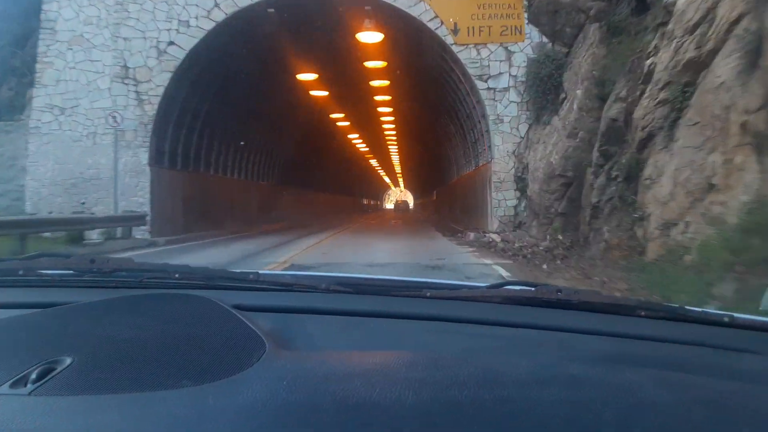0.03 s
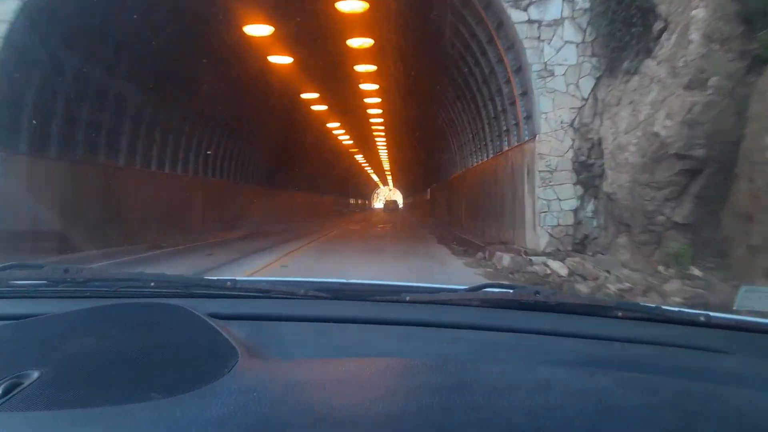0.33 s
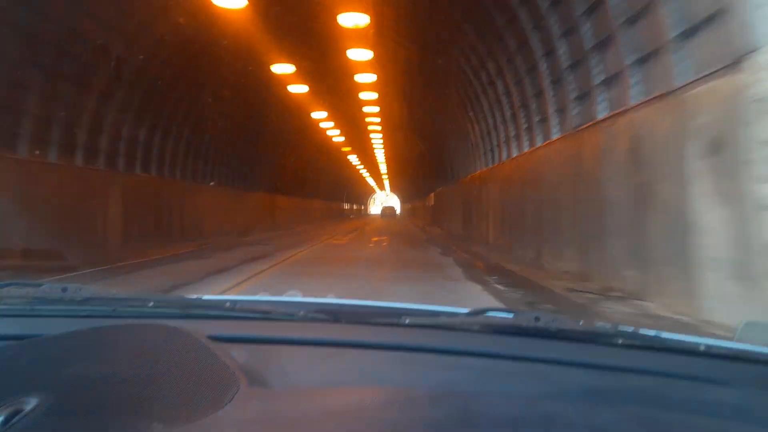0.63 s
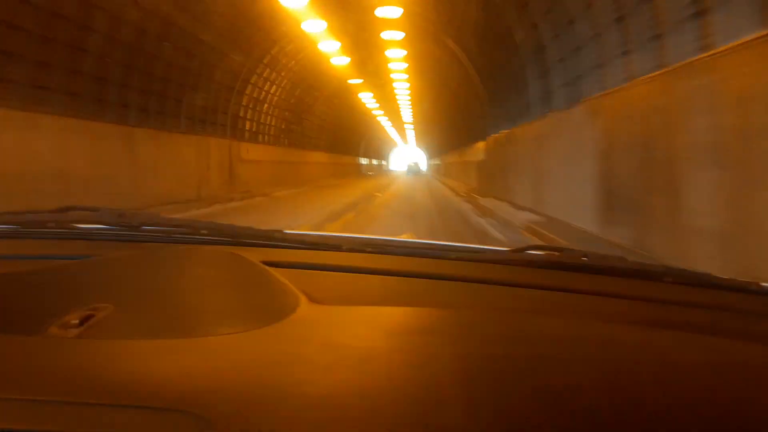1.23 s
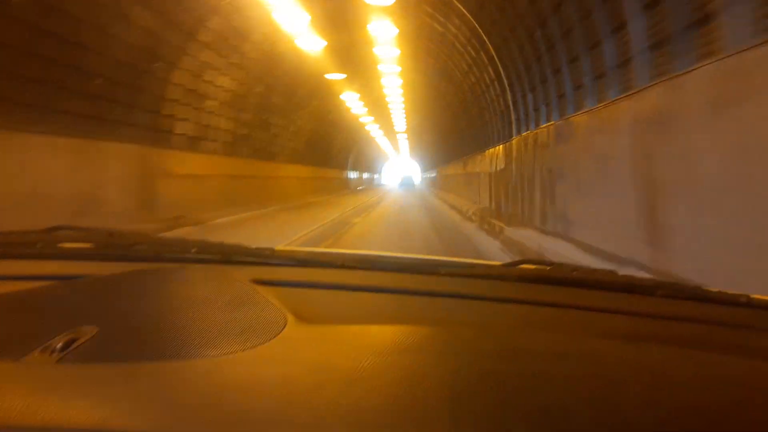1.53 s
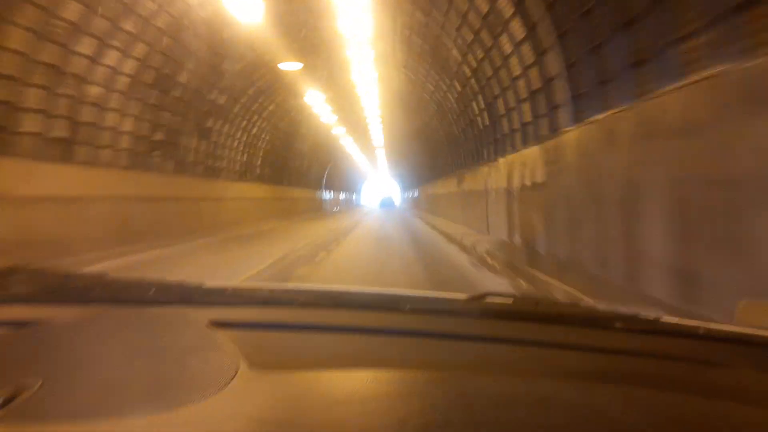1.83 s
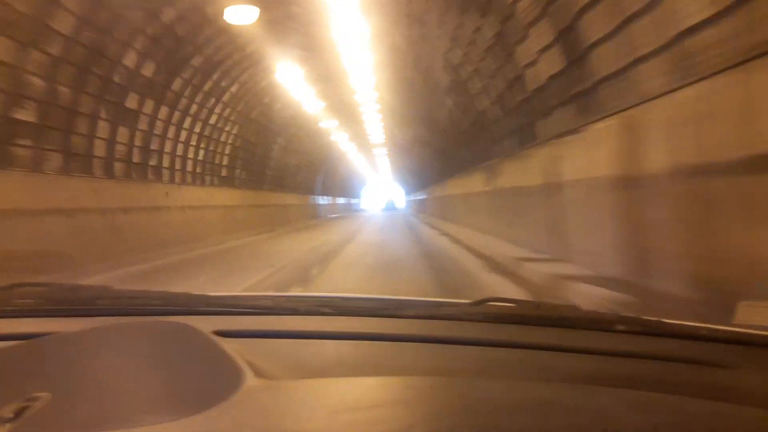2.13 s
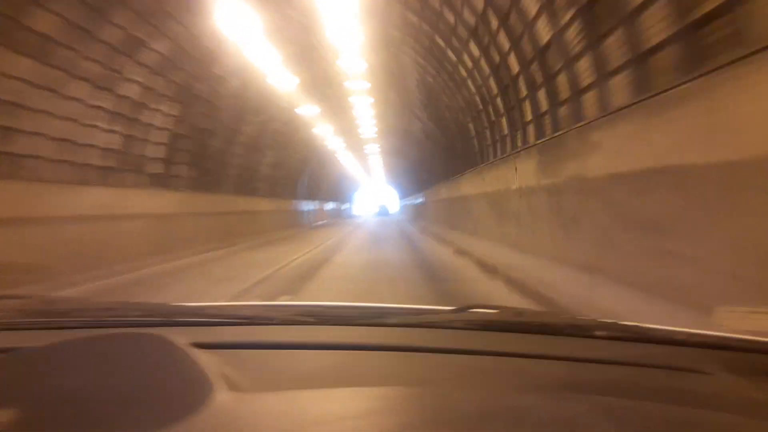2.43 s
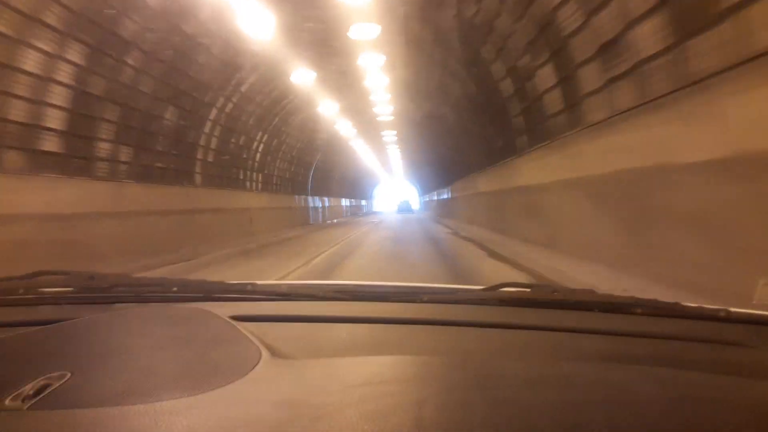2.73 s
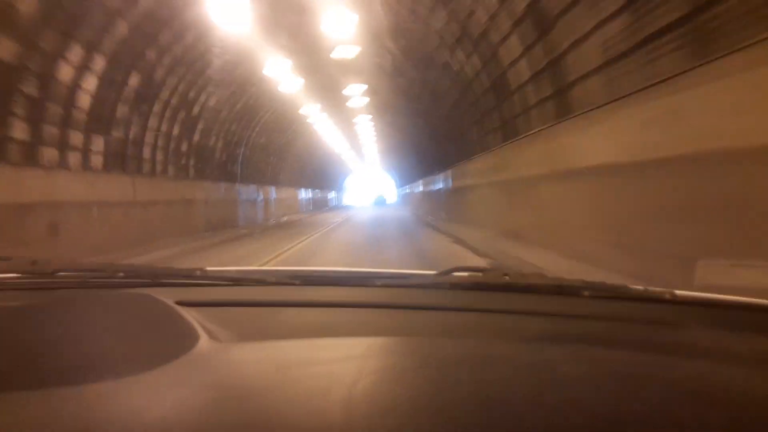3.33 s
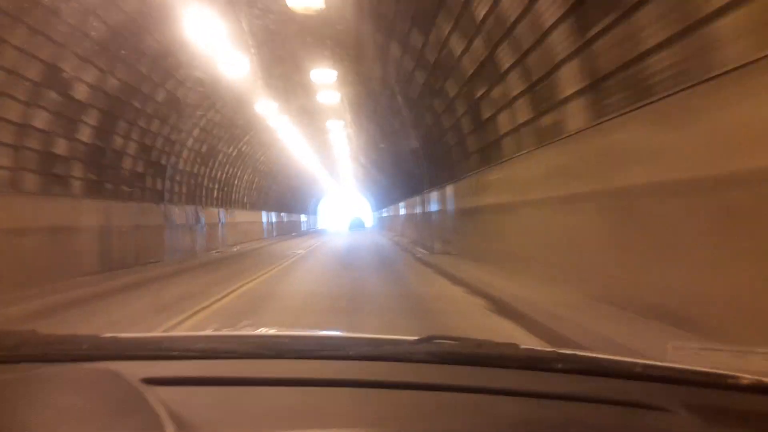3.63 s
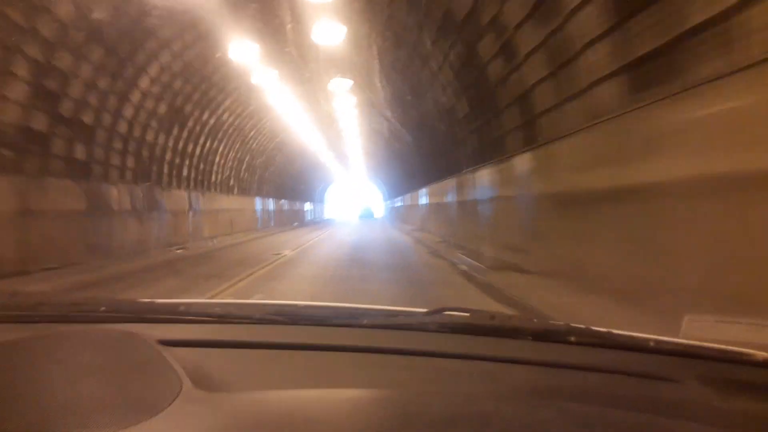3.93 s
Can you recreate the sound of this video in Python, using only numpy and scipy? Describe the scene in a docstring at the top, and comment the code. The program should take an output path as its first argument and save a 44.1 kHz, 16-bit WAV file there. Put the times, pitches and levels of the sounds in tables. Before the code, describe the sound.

Road rumble inside a car, growing into a brighter tyre roar in a tunnel, with bumps.

```python
"""Inside a car driving into a road tunnel. The road shakes the body and booms in the cabin over a steady
engine drone; from the portal on, the walls throw the tyre roar back, louder and brighter, and the tread
hums. The dashboard buzzes, and something chirps faintly in time with the engine, now and then louder,
as a short high squeak. Bumps knock the dashboard, thud in the body and set loose trim rattling."""
import sys
import numpy as np
from scipy import signal
from scipy.fft import rfft, irfft
from scipy.io import wavfile
from scipy.ndimage import uniform_filter1d

SR = 44100
rng = np.random.default_rng(int(sys.argv[2]) if len(sys.argv) > 2 else 0)


def int16_out(signal):
    """Quantize to a 16-bit WAV file."""
    q = np.round(np.clip(np.atleast_2d(signal).T, -1, 1) * 32767)
    wavfile.write(sys.argv[1], SR, q.astype(np.int16))


N = 176400
T, HZ = np.arange(N) / SR, np.maximum(np.arange(N // 2 + 1) * SR / N, 1)

# engine pitch: (time [s], firing rate [Hz])
FIRING_RATE = [(0, 81.5), (1.0, 83), (2.2, 82.8), (2.6, 86.3), (4.0, 86.2)]
# drone harmonics: (multiple of the firing rate, level [dB])
ENGINE_HARMONICS = [(1, -28), (2, -43), (4, -42.5)]
# fader for the deep body boom, ahead of its gain: (time [s], level [dB])
BOOM_FADER = [(0.0, -53), (0.07, -30), (0.8, -20), (1.34, -31), (1.51, -22), (1.57, -29), (1.94, -20),
              (1.99, -26), (2.73, -18.5), (2.84, -33), (3.43, -32), (3.44, -38), (3.85, -20), (4.0, -33)]
# boom resonances: (frequency [Hz], width [Hz], relative level [dB])
BOOM_MODES = [(51.5, 5.4, 6), (46, 24, -21)]
# fader for the cabin rumble, ahead of its gain: (time [s], level [dB])
RUMBLE_FADER = [(0.0, -22), (0.22, -14), (0.26, -33), (0.42, -16), (0.57, -15), (0.59, -12), (0.91, -29),
                (0.97, -14.5), (1.04, -31), (1.07, -17), (1.15, -21.5), (1.17, -40), (1.22, -15.5),
                (1.26, -33), (1.32, -21), (1.44, -29.5), (1.54, -17), (1.69, -30.5), (1.79, -17.5),
                (1.88, -30), (1.98, -22), (2.16, -26), (2.45, -18), (2.63, -26.5), (2.65, -20), (3.45, -31),
                (3.52, -26), (3.55, -18.5), (3.97, -24.5), (4.0, -24)]
# rumble resonances: (frequency [Hz], width [Hz], relative level [dB])
RUMBLE_MODES = [(105.3, 15.4, -7), (122.4, 9.1, -4.5)]
# fader for the drumming above the rumble, ahead of its gain: (time [s], level [dB])
DRUM_FADER = [(0, -24.5), (.3, -27.5), (.38, -19), (.6, -24.5), (.85, -27.5), (1.5, -27), (1.9, -23.5),
              (2.5, -24.5), (2.9, -24), (3.45, -25.5), (3.7, -22.5), (4, -24)]
# drumming resonances: (frequency [Hz], width [Hz], relative level [dB]), and its gain
DRUM_MODES, DRUM_GAIN_DB = [(158.4, 22.3, 4.5), (185, 30, 1)], -2
# fader for road noise through the body: (time [s], level [dB])
ROAD_FADER = [(0, -24), (.35, -22.5), (.42, -21.5), (.66, -24), (.85, -30.5), (1.4, -31), (1.7, -29.5),
              (2.5, -25.5), (2.8, -30), (3.45, -30), (3.8, -28.5), (4, -21)]
# its dark EQ: (frequency [Hz], relative level [dB])
ROAD_EQ = [(20, -25), (40, -11), (66, 1.5), (140, -5.5), (215, -5), (290, -6.5), (370, -5), (450, -10.5),
           (560, -20), (760, -13.5), (1100, -17), (2000, -31), (4000, -48.5)]
# fader for the tyre roar, lifted by the tunnel walls: (time [s], level [dB])
ROAR_FADER = [(0, -30.5), (.3, -34.5), (.55, -35.5), (.8, -32), (1.0, -29), (1.4, -28.5), (2.0, -26),
              (2.5, -25), (2.75, -25), (3.1, -25.5), (3.6, -24.5), (4, -24)]
# its mid-heavy EQ: (frequency [Hz], relative level [dB])
ROAR_EQ = [(250, 3.5), (560, -3), (620, -4), (700, 6), (790, -3), (1010, -4), (1130, 1.5), (1400, -3.5),
           (1850, -1.5), (2080, -5.5), (2250, -3.5), (2700, -6), (3200, -13), (4400, -19.5), (5500, -30.5),
           (9000, -51)]
# fader for the tyre hiss; the faint chirps ride it too: (time [s], level [dB])
HISS_FADER = [(0, -46.5), (.3, -47), (.5, -50.5), (.82, -45.5), (.88, -43), (1.4, -43), (2.0, -41),
              (2.7, -41.5), (3.5, -42.5), (4, -40)]
# the hiss's airy EQ: (frequency [Hz], relative level [dB])
HISS_EQ = [(2000, 2.5), (4200, 2), (5600, 0.5), (6300, 2.5), (7100, -0.5), (8000, -1), (9300, -1.5),
           (10500, -4), (12200, -5.5), (13500, -7.5), (16000, -11)]
# fader for the dashboard buzz: (time [s], level [dB])
BUZZ_FADER = [(0, -29.5), (.3, -39), (.6, -42), (.85, -45), (1.5, -34), (1.68, -30.5), (1.85, -35),
              (2.5, -31.5), (3.2, -28.5), (4, -33.5)]
# dashboard resonances: (frequency [Hz], width [Hz], relative level [dB])
DASH_MODES = [(778, 48, 1), (860, 85, 0), (1008, 45, -1.5), (1130, 130, -7), (1800, 400, -11),
              (2060, 140, 0), (2380, 300, -9), (2750, 300, -14), (4150, 1200, -16), (7400, 1800, -23)]
# chirp resonances: (frequency [Hz], width [Hz], relative level [dB])
CHIRP_MODES = [(6280, 400, 0), (7000, 450, -3.5), (10200, 900, -13), (14200, 1800, -11)]
# cues for bumps and rebounds: (time [s], knock drive [dB], thud level [dB], rattle level [dB])
BUMP_CUES = [(0.3627, -8, -10.5, -34), (0.380, -26, -34, -41), (0.400, -37, -23, -53),
             (0.446, -25, -21, -65), (1.069, -31.5, -24, -59), (1.437, -30, -33, -50),
             (1.636, -20, -27, -54), (1.657, -19.5, -23, -50), (1.888, -20.5, -26, -38),
             (2.2585, -10, -11.5, -26), (2.275, -21, -19.5, -42), (2.319, -12.5, -13, -28.5),
             (2.334, -22, -21, -44), (2.411, -17.5, -22.5, -37), (2.988, -15, -13.5, -33.5),
             (3.819, -20.5, -17.5, -39)]
# dull EQ of the body thud: (frequency [Hz], relative level [dB])
THUD_EQ = [(60, -0.5), (150, -11.5), (270, 2), (400, -9), (550, -13), (1000, -15)]
# bright EQ of the trim rattle: (frequency [Hz], relative level [dB])
RATTLE_EQ = [(800, -20), (2500, 13.5), (4600, 10.5), (5600, 6.5), (7300, 10), (9000, 4), (12000, 2.5),
             (16000, -11)]
# cues for the louder chirps: (time [s], pitch [Hz], level [dB], pan left over right [dB])
LOUDER_CHIRP_CUES = [(0.589, 4380, -38, 3), (.967, 6900, -40, 0), (1.982, 6460, -41, -4),
                     (3.066, 6400, -43, -3), (3.946, 6500, -42, -1)]
# fader for the tread hum in the tunnel: (time [s], level [dB])
TREAD_FADER = [(.88, -64), (.98, -36.5), (1.5, -41), (2.2, -38), (2.6, -52), (4, -56)]
# the hum's note: (frequency [Hz], width [Hz], relative level [dB])
TREAD_MODES = [(702, 28, 0)]
# stereo image, near mono in the bass and wide on top: (frequency [Hz], correlation [0-1])
MIC_CORRELATION = [(60, .995), (190, .975), (300, .88), (450, .75), (560, .55), (780, .65), (950, .3),
                   (1200, .5), (1700, .2), (2300, .4), (3200, .2), (7000, .38), (15000, .28)]
# stereo balance: (frequency [Hz], left over right [dB])
MIC_BALANCE = [(60, 3), (200, -0.1), (550, 0.5), (770, 2), (1170, -2.5), (1900, -5.5), (2700, -3),
               (4200, 0.5), (6400, -1), (9500, -10.5), (12000, -5.5), (15000, -4)]


def from_db(db):
    """Decibels to gain."""
    return 10 ** (np.asarray(db) / 20)


def unit_rms(x):
    """Scale to unit power."""
    return x / np.sqrt(np.mean(x ** 2) + 1e-20)


def automation(rows):
    """A control curve at every sample."""
    return np.interp(T, *np.transpose(rows))


def over_hz(rows):
    """A table joined by straight lines over log frequency."""
    hz, value = np.transpose(rows)
    return np.interp(np.log(HZ), np.log(hz), value)


def eq(rows):
    """Gain per frequency, rolling off above the last point."""
    return from_db(over_hz(rows)) / (1 + (HZ / rows[-1][0] / 2) ** 4)


def drift(hz):
    """A random wobble, mostly slower than hz; rms 1."""
    return unit_rms(irfft(rfft(rng.standard_normal(N)) / (1 + (HZ / hz) ** 2), N))


def at_mics(left, right, left_lag_s=.00042, in_step_below_hz=370):
    """Two spectra to stereo: the left is duller and later, but long waves reach both mics together."""
    tilt = from_db(over_hz(MIC_BALANCE) / 2)
    lag = left_lag_s * HZ ** 2 / (HZ ** 2 + in_step_below_hz ** 2)
    return irfft(np.array([left * tilt * np.exp(-2j * np.pi * HZ * lag), right / tilt]), N)


def cabin_noise(gain=1):
    """Stereo noise through an EQ, tight in the bass and diffuse in the treble; rms 1."""
    mid, side = rfft(rng.standard_normal((2, N)))
    alike = over_hz(MIC_CORRELATION)
    mid, side = gain * mid * np.sqrt(1 + alike), gain * side * np.sqrt(1 - alike)
    return unit_rms(at_mics(mid + side, mid - side))


def resonant_noise(modes, even_s):
    """Narrow bands of noise, their level evened out over even_s; rms 1."""
    gain = sum(from_db(db) / np.sqrt(width) / (1 + ((HZ - hz) / width) ** 2) ** 1.5
               for hz, width, db in modes)
    bands = cabin_noise(gain)
    power = np.mean(np.abs(signal.hilbert(bands)) ** 2, axis=0)
    return unit_rms(bands / np.sqrt(uniform_filter1d(power, int(even_s * SR)) + 1e-9))


def ring(x, modes):
    """Parallel resonators of alternating polarity; white noise keeps about its power."""
    out, power = 0, 0
    for k, (hz, width, db) in enumerate(modes):
        radius = np.exp(-np.pi * width / SR)
        b = np.sqrt((1 - radius ** 2) / 2) * np.array([1, 0, -1])
        a = [1, -2 * radius * np.cos(2 * np.pi * hz / SR), radius ** 2]
        out = out + (-1) ** k * from_db(db) * signal.lfilter(b, a, x + 1e-18)
        power += from_db(db) ** 2
    return out / np.sqrt(power)


def burst(start, attack_s, hold_s, decay_s):
    """Attack, hold and exponential release."""
    age = T - start
    return np.clip(age / attack_s, 0, 1) * np.exp(-np.maximum(age - attack_s - hold_s, 0) / decay_s)


def engine_drone(jitter=.0077, waver_db=4.5):
    """Wavering harmonics of the firing rate, which creeps upward."""
    firing_hz = automation(FIRING_RATE) * (1 + jitter * drift(6.86))
    phase = 2 * np.pi * np.cumsum(firing_hz) / SR
    drone = 0
    for multiple, db in ENGINE_HARMONICS:
        amplitude = np.sqrt(2) * from_db(db + waver_db * drift(3.4))
        drone = drone + amplitude * np.sin(multiple * phase + rng.uniform(0, 2 * np.pi))
    return at_mics(rfft(drone), rfft(drone))


def cabin_boom(boom_gain_db=-3, rumble_gain_db=1):
    """The low end: the road shakes body and cabin into boom, rumble and drumming."""
    boom = from_db(automation(BOOM_FADER) + boom_gain_db) * resonant_noise(BOOM_MODES, even_s=.075)
    rumble = from_db(automation(RUMBLE_FADER) + rumble_gain_db) * resonant_noise(RUMBLE_MODES, even_s=.07)
    drum = from_db(automation(DRUM_FADER) + DRUM_GAIN_DB) * resonant_noise(DRUM_MODES, even_s=.16)
    return boom + rumble + drum


def road_noise(flicker_db=3):
    """A broad, dark bed that comes up through the suspension."""
    return from_db(automation(ROAD_FADER) + flicker_db * drift(9.9)) * cabin_noise(eq(ROAD_EQ))


def tyre_roar(flicker_db=1.17):
    """Airborne roar that swells as the tunnel walls throw it back."""
    return from_db(automation(ROAR_FADER) + flicker_db * drift(12.3)) * cabin_noise(eq(ROAR_EQ))


def tyre_hiss(flicker_db=1.23):
    """The tyres' top end, opening up inside the tunnel."""
    return from_db(automation(HISS_FADER) + flicker_db * drift(12)) * cabin_noise(eq(HISS_EQ))


def dashboard_buzz(flicker_db=3, taps_per_s=23, taps_db=-42, spread_db=2.5, decay_s=.004):
    """The road keeps the dashboard ringing with a buzz and a chatter of small, uneven taps."""
    buzz = from_db(automation(BUZZ_FADER) + flicker_db * drift(25)) * cabin_noise()
    hits = rng.random(N) < taps_per_s / SR
    strength = from_db(spread_db * np.minimum(rng.exponential(1, N), 3))
    envelope = signal.lfilter([1], [1, -np.exp(-1 / (decay_s * SR))], hits * strength + 1e-18)
    chatter = from_db(taps_db) * unit_rms(envelope * cabin_noise())
    return ring(buzz + chatter, DASH_MODES)


def chirps(over_hiss_db=-3, spread_db=3.5, half_length_s=.0051):
    """A faint high chirp of uneven strength, once per engine cycle."""
    cycle_hz = automation(FIRING_RATE) / 4   # four firings to a cycle
    cycles = np.cumsum(cycle_hz) / SR + .15
    nearest = np.round(cycles).astype(int)
    accent_db = spread_db * rng.uniform(-1.2, 1, nearest[-1] + 1)[nearest]
    pulse = np.exp(-((cycles - nearest) / cycle_hz / half_length_s) ** 2)
    level = from_db(automation(HISS_FADER) + over_hiss_db + accent_db)
    return level * pulse * ring(cabin_noise(), CHIRP_MODES)


def bumps(attack_s=.005, hold_s=.002, contact_s=.0045, scrape_db=-8, tail_db=-15, rattle_lag_s=.012):
    """Each bump knocks the dashboard and thuds in the body; loose trim rattles just after."""
    blows, rough, thud, rattle = np.zeros((4, N))
    for start, knock_db, thud_db, rattle_db in BUMP_CUES:
        # the knock: a hard blow with rough contact around it
        blows[int((start + attack_s) * SR)] += from_db(knock_db) * np.sqrt(contact_s * SR)
        rough += from_db(knock_db + scrape_db) * burst(start, attack_s, hold_s, decay_s=.004)
        rough += from_db(knock_db + tail_db) * burst(start, attack_s, hold_s, decay_s=.02)
        thud += from_db(thud_db) * burst(start, attack_s, hold_s, decay_s=.011)
        rattle += from_db(rattle_db) * burst(start + rattle_lag_s, attack_s=.0051, hold_s=0, decay_s=.011)
    knocks = ring(at_mics(rfft(blows), rfft(blows)) + rough * cabin_noise(), DASH_MODES)
    return knocks + thud * cabin_noise(eq(THUD_EQ)) + rattle * cabin_noise(eq(RATTLE_EQ))


def louder_chirps(half_length_s=.006, half_width_hz=150):
    """Short high squeaks, mostly accents of the chirp that keeps time with the engine."""
    out = 0
    for time, hz, db, pan_db in LOUDER_CHIRP_CUES:
        tone = cabin_noise(1 / (1 + ((HZ - hz) / half_width_hz) ** 4))
        blip = np.exp(-((T - time) / half_length_s) ** 2)
        out = out + from_db(db + pan_db * np.array([[.5], [-.5]])) * blip * tone
    return out


def tread_hum():
    """The tread sings one note that comes in at the portal and later sinks under the roar."""
    return from_db(automation(TREAD_FADER)) * resonant_noise(TREAD_MODES, even_s=1)


def scene():
    """The mix from behind the windscreen."""
    engine = engine_drone() + chirps()
    road = cabin_boom() + road_noise()
    tyres = tyre_roar() + tread_hum() + tyre_hiss()
    return engine + road + tyres + bumps() + dashboard_buzz() + louder_chirps()


def record(dry, low_cut_hz=34, ceiling=.9, high_cut_hz=15750):
    """Master chain: low cut, soft clip on the highest peaks, steep high cut."""
    tightened = irfft(rfft(dry) / (1 + (low_cut_hz / HZ) ** 8), N)
    rounded = tightened / (1 + (tightened / ceiling) ** 6) ** (1 / 6)
    return irfft(rfft(rounded) / (1 + (HZ / high_cut_hz) ** 300), N)


dry = scene()
out = record(dry)
int16_out(out)
```